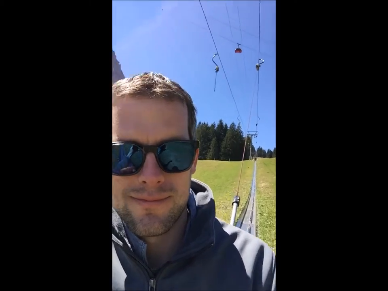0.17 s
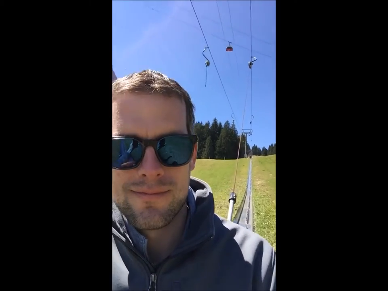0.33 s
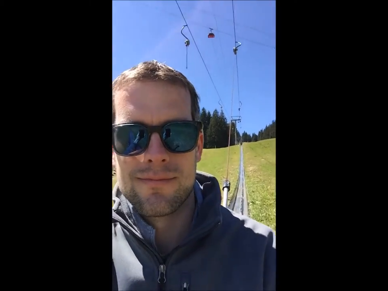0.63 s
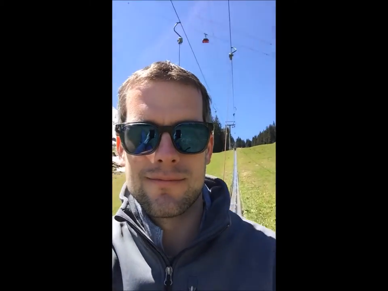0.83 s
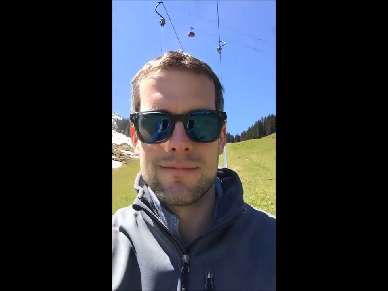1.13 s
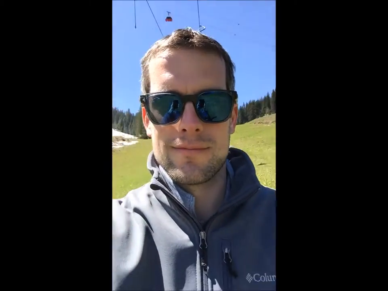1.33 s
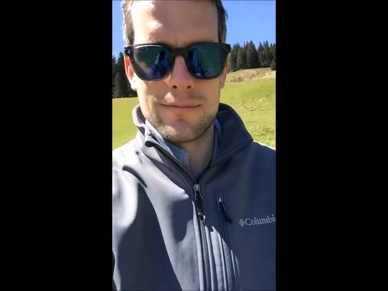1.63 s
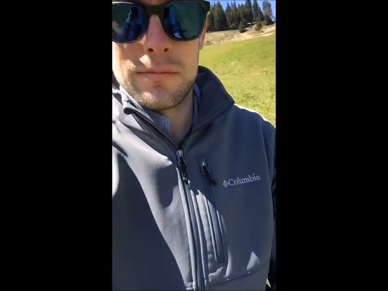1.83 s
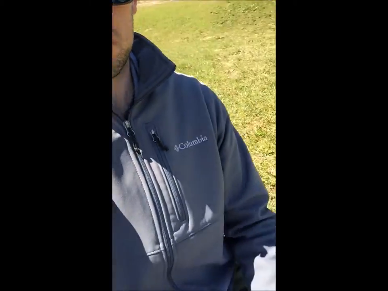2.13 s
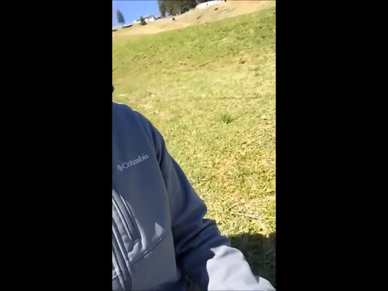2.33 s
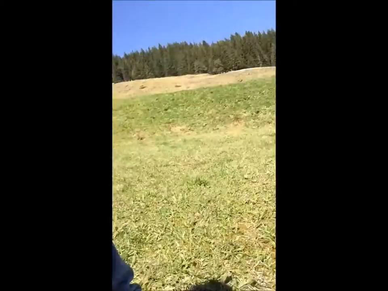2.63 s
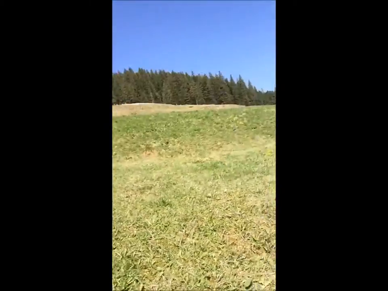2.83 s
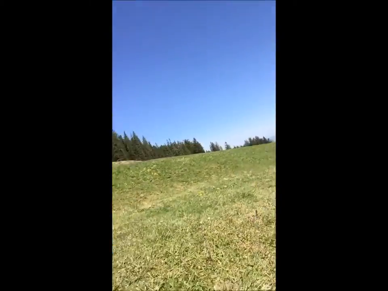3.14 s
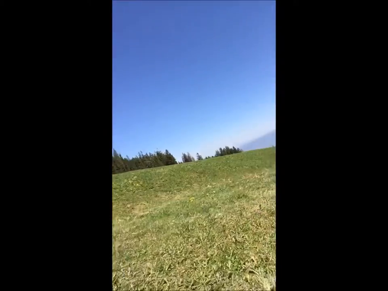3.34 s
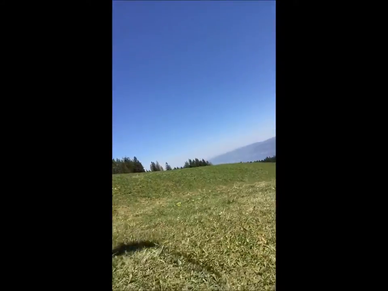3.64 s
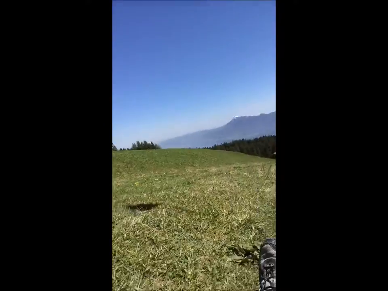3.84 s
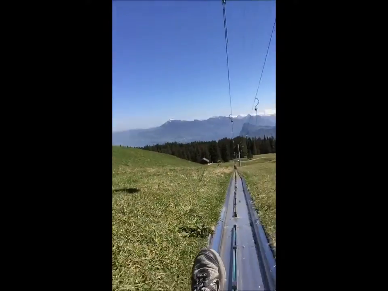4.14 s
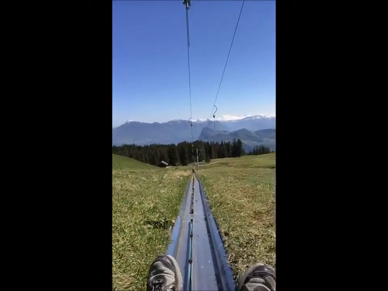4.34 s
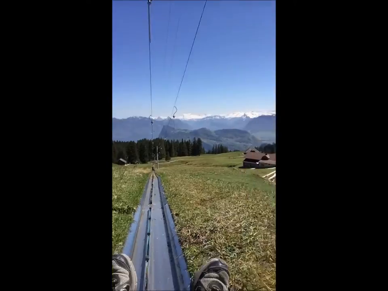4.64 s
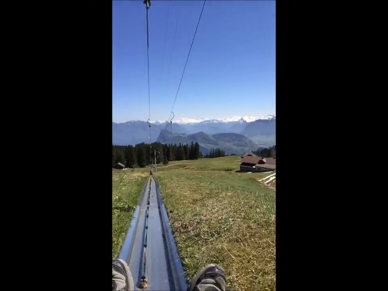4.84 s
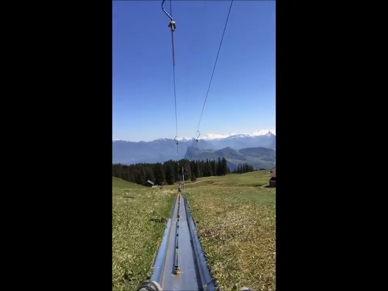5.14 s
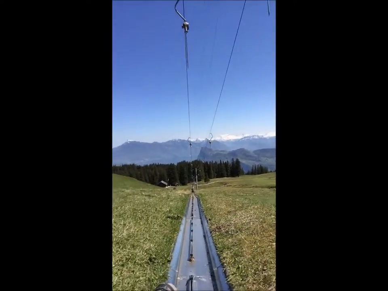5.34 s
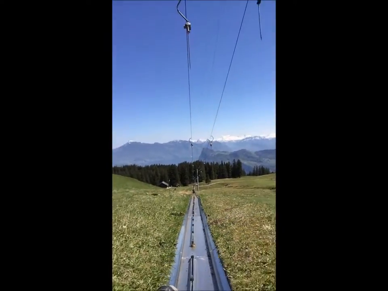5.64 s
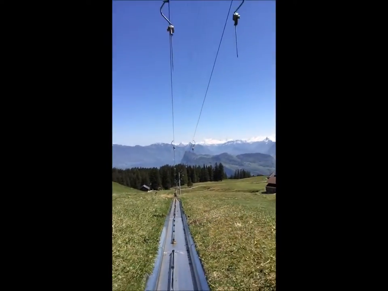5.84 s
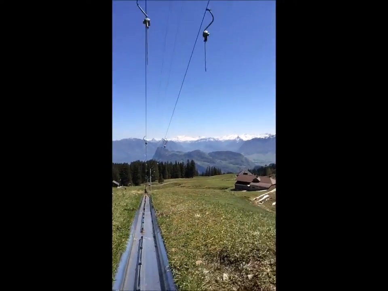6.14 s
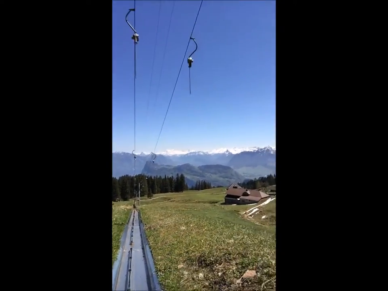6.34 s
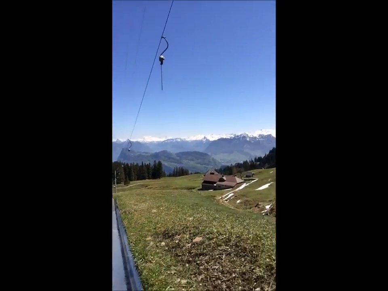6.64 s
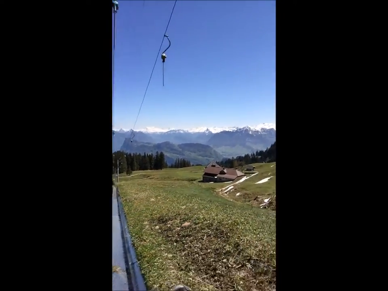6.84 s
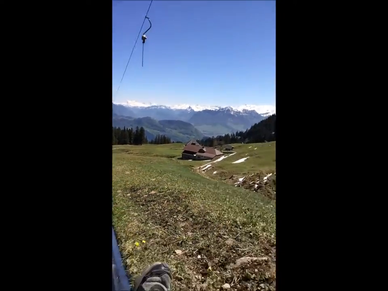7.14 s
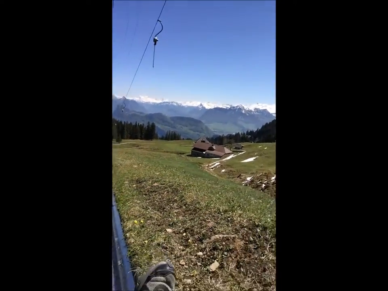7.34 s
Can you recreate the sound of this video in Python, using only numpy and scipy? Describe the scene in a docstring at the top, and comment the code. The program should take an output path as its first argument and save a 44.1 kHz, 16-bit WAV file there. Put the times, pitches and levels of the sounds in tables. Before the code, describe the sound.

Rapid metallic clacking from a sled's wheels on a jointed rail, starting fairly soft and dull, then getting louder and brighter after about two seconds. Hard jolts boom through the hollow plastic seat, loose fittings tick and rattle, and wheels rumble and scrape between blows. A sleeve rustles softly, light wind buffets the small phone-like microphone, and a thin high whistle flares now and then. Outdoors, with no echo.

```python
"""Wheels clack and rebound over the rail joints as a sled is towed up a mountain-coaster track, heard on board.
Each clack is a crowd of tiny collisions exciting steel resonances; decaying modes clang and ring on.
Damped swings thump the plastic shell, jolts make it boom, and small parts tick, ping and rattle.
Beneath lie coloured-noise rumble, scrape and hiss, a friction whistle, a wavering low hum,
a rustling sleeve and soft wind on the microphone."""
import sys
import numpy as np
from scipy import signal
from scipy.fft import rfft, irfft
from scipy.io import wavfile

SR = 44100
rng = np.random.default_rng(int(sys.argv[2]) if len(sys.argv) > 2 else 0)


def to_wav(sig):
    """Store sig (one row per channel, or 1-D mono) as 16-bit WAV at the path in sys.argv[1].

    Samples outside -1..1 are clipped; the rate is SR.
    """
    pcm = np.clip(np.atleast_2d(sig), -1, 1) * 32767
    pcm = np.round(pcm).astype(np.int16)
    wavfile.write(sys.argv[1], SR, pcm.T)  # frames by channels


N = 329868

# A wheel crosses a joint; levels before each layer's trim: (time [s], shell thud [dB], shell bark [dB],
# steel middle [dB], treble [dB], top [dB], low clang [Hz], high clang [Hz])
JOINT_CROSSINGS = [(0.0283, -32, -37.5, -43.5, -52, -67, 914, 2530),
                   (0.0447, -34.5, -31.5, -37, -48.5, -58, 1070, 4390),
                   (0.164, -30.5, -32.5, -36, -66.5, -74, 1004, 2300),
                   (0.2515, -34, -37, -37.0, -43.5, -60, 990, 3100),
                   (0.3698, -31, -40, -36, -39, -51, 1225, 3410),
                   (0.579, -27.5, -36, -30.5, -37.5, -54, 1340, 2950),
                   (0.6506, -38.5, -44.5, -33.5, -42, -61, 933, 3020),
                   (0.8517, -28.5, -36, -33, -38.5, -55.5, 1370, 2230),
                   (0.933, -26, -41, -37.5, -45, -58, 1616, 2280),
                   (1.1359, -36.5, -44, -36, -41.5, -62, 1255, 2440),
                   (1.1931, -40, -47.0, -42, -57, -70, 1180, 2720),
                   (1.2939, -40, -46, -38.5, -53, -64, 1206, 2400),
                   (1.5718, -29.5, -43, -32, -43.5, -55, 1182, 2480),
                   (1.7711, -22.5, -47, -28.5, -36.5, -49.5, 1205, 2140),
                   (1.8513, -36, -48, -29.5, -39.5, -57, 1330, 2486),
                   (2.036, -28, -34, -30, -38.5, -53.5, 2003, 3000),
                   (2.1375, -23, -30, -26, -36, -47, 1250, 3064),
                   (2.3498, -31.5, -40, -25, -33.5, -49.5, 1280, 3040),
                   (2.4379, -35, -44, -28.5, -34, -61, 1260, 3110),
                   (2.651, -31, -29, -32.0, -39.5, -53, 1218, 2560),
                   (2.7559, -31, -29, -35.5, -41.5, -55.5, 1420, 3230),
                   (2.8459, -36, -24, -36.5, -42.5, -49, 805, 3760),
                   (3.0581, -29.5, -45, -43, -49, -57, 1180, 3750),
                   (3.2211, -28.5, -43, -29, -36.5, -50, 1284, 2450),
                   (3.3019, -19, -39, -25, -34, -46, 1388, 3070),
                   (3.513, -31, -32, -23.0, -33, -47, 1128, 3084),
                   (3.5764, -29, -32, -29.5, -38, -52.5, 1160, 3080),
                   (3.7752, -31, -41, -26.5, -36, -53, 1013, 3190),
                   (3.8613, -36, -32.5, -30.5, -31, -43.5, 1240, 3000),
                   (4.0796, -38, -29, -28.5, -38.5, -50, 1080, 2300),
                   (4.1693, -34.0, -36, -30, -36.5, -47, 1210, 3030),
                   (4.275, -38, -38, -37.5, -53, -61, 1090, 3330),
                   (4.3956, -54, -34, -41, -67, -68, 1130, 2760),
                   (4.6174, -40, -35.5, -31.5, -42.5, -54, 1260, 3920),
                   (4.752, -25, -40, -26.5, -34.5, -38, 1346, 2140),
                   (4.9761, -36.0, -30.0, -31.5, -36, -48.5, 1370, 3250),
                   (5.053, -35.5, -31.5, -30.5, -39.5, -50, 1446, 4060),
                   (5.2603, -36, -31.5, -28.5, -37.5, -49, 1150, 3960),
                   (5.3492, -35, -26.5, -27.5, -33, -43, 1123, 3110),
                   (5.5678, -53, -28.5, -30, -41.5, -57, 987, 2470),
                   (5.6563, -39, -25.5, -29, -40.5, -52, 1090, 3120),
                   (5.7593, -59, -48, -41.5, -55, -57, 780, 4430),
                   (5.8839, -42, -39, -46, -55, -68.5, 975, 2420),
                   (6.1102, -31.0, -32, -35, -42.5, -56, 1780, 3410),
                   (6.2387, -32, -26, -26.5, -36, -45, 1370, 3130),
                   (6.4608, -45, -26, -28, -36, -54, 1965, 3050),
                   (6.5309, -30.5, -32.5, -33.5, -39.5, -53, 1370, 2930),
                   (6.7269, -34, -31, -29.5, -39, -55.5, 1300, 3020),
                   (6.8274, -27, -34, -25.5, -34, -48, 1255, 3097),
                   (7.0368, -30, -25.5, -30, -39, -54.5, 1310, 3000),
                   (7.159, -36, -32.5, -38, -43, -61, 1237, 3030),
                   (7.2419, -28, -33, -37, -48.5, -44.5, 1190, 4280),
                   (7.4578, -34, -36.5, -34, -40, -47.5, 1060, 2560)]
# Crossovers between the bass, middle, treble and top of a clack: [Hz]
CLACK_CROSSOVERS = [700, 2200, 7000]
# Broad spectrum of struck steel: (frequency [Hz], relative density [dB per Hz])
STEEL_SPECTRUM = [(50, -14), (120, -13.5), (240, -6.5), (450, -0.5), (700, -10), (1000, -8), (1380, -8),
                  (1500, -13.5), (1850, -12), (2700, -14.5), (4000, -21), (4800, -27), (6000, -29),
                  (10000, -53), (13000, -58.5), (16000, -65)]
# Resonances of wheel and rail: (frequency [Hz], width [Hz], lift [dB])
WHEEL_RESONANCES = [(1187, 110, 4.5), (1784, 130, 2), (2970, 110, 2.5), (3146, 400, 7.5), (3690, 290, 4.5),
                    (3990, 180, 5.5), (5264, 480, 9), (5200, 165, 3), (6150, 90, 2), (7450, 150, 1),
                    (11630, 450, 8.5), (12300, 290, 13)]
# Modes of the rail: (frequency [Hz], relative level [dB], 60 dB decay time [s])
RAIL_MODES = [(950, 1.5, 0.14), (1136, -7.5, 0.31), (1338, -2.5, 0.22), (1695, -19.5, 0.19),
              (2064, -14, 0.36), (3116, -5, 0.19), (3580, -4, 0.13), (4400, -6, 0.11)]


def clacks(size=8192, count=14, bass_db=-6):
    """Impact excitation: chattering contact drives steel resonances, and each joint adds modes of its own."""
    out, t = np.zeros(N), np.arange(size) / SR
    for s, _, _, middle_db, treble_db, top_db, low_hz, high_hz in JOINT_CROSSINGS:
        weak_hz = 700 * 2 ** (3.5 * rng.random(count))
        # weak resonances are lifted and lowered in turn
        weak_peaks = [(hz, 0.04 * hz, 5 * (-1) ** k) for k, hz in enumerate(weak_hz)]
        body = colour(STEEL_SPECTRUM, WHEEL_RESONANCES + weak_peaks)

        rise = rng.uniform(.0015, .0035)
        force = chatter(t, rise, fall=0.0077, tail_db=-5.5, tail_t60=0.089, grain_db=4)
        force += .8 * bounces(t - .0013, gap=.0024, contact=.00013)
        force += rebounds(t)
        blow = evened(signal.fftconvolve(force, body)[:size])

        clang_modes = [(low_hz, -1, 0.043), (high_hz, -5, 0.043)]
        clang = ring(clang_modes, t, scatter_db=1, detune=0)
        blow += gain_of(-6) * evened(clang * (1 - np.exp(-t / .0012)))

        own_modes = [(low_hz, 0, 0.17), (high_hz, -5, 0.17)]
        # higher weak modes are fainter and die sooner
        weak_modes = [(hz, -4 - 7 * np.log2(hz / 700), 0.35 * np.sqrt(700 / hz)) for hz in weak_hz]
        rail = evened(ring(RAIL_MODES + own_modes + weak_modes, t, scatter_db=2.5, detune=0.013))

        levels_db = np.array([middle_db + bass_db, middle_db, treble_db, top_db])
        add(out, s, weigh(blow + gain_of(-10) * rail, CLACK_CROSSOVERS, levels_db, span=0.018))
    return gain_of(0.62) * out


def bounces(t, gap, contact, count=4):
    """Inelastic rebound: a wheel lands and skips, with alternating sign and each touch weaker."""
    at = np.cumsum(gap * rng.uniform(.5, 1.5, (count, 1)), 0) - gap / 2
    strength = (-.85) ** np.arange(count)[:, None]
    return (np.exp(-((t - at) / contact) ** 2) * strength).sum(0)


def rebounds(t, first=0.011, last=0.06, fall=0.022, touch=0.00098, dull_hz=2200, count=8):
    """Repeated impact: the loose mounting strikes at uneven moments, dully and generally ever weaker."""
    at = first + (last - first) * (np.arange(count) + rng.random(count))[:, None] / count
    strength = gain_of(0.75 * rng.standard_normal((count, 1))) * np.exp(-at / fall)
    envelope = (strength * (t > at) * np.exp(-abs(t - at) / touch)).sum(0)
    touches = envelope * rng.standard_normal(len(t))
    return signal.sosfilt(signal.butter(2, dull_hz, fs=SR, output="sos"), touches)


def thumps(thud_hz=228, bark_hz=435, delay_s=0.0005):
    """Damped oscillation: every rail joint reaches the seat through the shell as a short, rounded thump."""
    out = np.zeros(N)
    for s, thud_db, bark_db, *_ in JOINT_CROSSINGS:
        thud = gain_of(thud_db + 4.5) * wobble(thud_hz, peak_s=0.0071)
        bark = gain_of(bark_db + 2.5) * wobble(bark_hz, peak_s=0.0072)
        add(out, s + delay_s, thud + bark)
    return out


def wobble(hz, peak_s, size=4096):
    """Heavy damping: a few swings swell and die, with random detuning and phase."""
    t = np.arange(size) / SR
    shift, turn = rng.uniform(-1, 1, 2)
    envelope = (t / peak_s * np.exp(1 - t / peak_s)) ** 2
    return envelope * np.sin(2 * np.pi * (hz * (1 + .12 * shift) * t + turn))


# The shell is jolted; levels before a common trim:
# (time [s], low thud [dB], higher bark [dB], hard crack [dB])
JOLTS = [(0.379, -21.5, -26.5, -30), (1.005, -42, -51, -63), (1.074, -32.5, -46.5, -63),
         (1.101, -45, -44.5, -51.5), (1.329, -35.5, -58, -48), (1.354, -35, -49, -58),
         (1.473, -41, -62, -50), (1.856, -20, -28.5, -28), (1.879, -29, -47, -47.5),
         (2.842, -27.5, -31, -36), (2.962, -34, -35.5, -54), (3.034, -34.5, -35, -59),
         (3.164, -56, -48, -40.5), (3.311, -25, -24, -21), (3.337, -26, -39, -41), (3.529, -42, -32, -54),
         (3.857, -38, -54, -35.5), (4.036, -38, -41.5, -55), (4.276, -28.5, -23.5, -69),
         (4.405, -33.5, -32, -45), (4.775, -16.5, -20, -18.5), (5.534, -34.5, -48, -51),
         (5.76, -39, -27.5, -47), (5.883, -29.5, -48, -43), (6.247, -28.5, -31, -48),
         (6.449, -46, -30.5, -63), (7.246, -27.5, -33, -29)]


def knocks():
    """Forced response: hard jolts set the shell booming."""
    out = np.zeros(N)
    for s, *levels_db in JOLTS:
        add(out, s, gain_of(0.76) * jolt(*levels_db, rise=0.0013))
    return out


# Crossovers between the thud, bark, crack and crunch of a knock: [Hz]
KNOCK_CROSSOVERS = [330, 560, 900]
# Modes of the shell: (frequency [Hz], relative level [dB], 60 dB decay time [s])
SHELL_MODES = [(173, 5, 0.11), (191, -4.5, 0.14), (252.3, 6, 0.12), (310, -6, 0.25), (364.6, -5, 0.14),
               (457, -5.5, 0.04), (548, -7, 0.066), (624, 2.5, 0.032), (770, -12.5, 0.097),
               (935, -8.5, 0.049)]
# Broad boom of the shell between its modes: (frequency [Hz], relative density [dB per Hz])
BOOM_SPECTRUM = [(50, -28), (110, -15), (185, 14), (260, -5.5), (400, -4), (650, -8.5), (800, -16),
                 (1350, -12), (1550, -21), (2100, -20), (3000, -30), (5000, -36.5), (10000, -62)]


def jolt(thud_db, bark_db, crack_db, rise, size=8192, lowest_hz=135, crunch_db=-7):
    """Modal excitation: a shove and rattle drive a hollow shell, whose boom holds little deep bass."""
    t = np.arange(size) / SR
    force = chatter(t, rise, fall=.0065, tail_db=-12, tail_t60=.085, grain_db=4.5)
    force += 1.16 * np.exp(-((t - .0015) / 0.00023) ** 2)  # the shove itself
    shell = evened(ring(SHELL_MODES, t, scatter_db=1, detune=0.014))
    shell += 0.78 * evened(colour(BOOM_SPECTRUM, size=size))
    bass_cut = signal.butter(2, lowest_hz, "high", fs=SR, output="sos")
    boom = signal.sosfilt(bass_cut, signal.fftconvolve(force, shell)[:size])
    # the crunch above the crack has a level relative to it
    levels_db = np.array([thud_db, bark_db, crack_db, crack_db + crunch_db])
    return weigh(boom, KNOCK_CROSSOVERS, levels_db, span=0.018)


# Small loose parts touch; levels before a common trim: (time [s], level [dB])
LIGHT_TOUCHES = [(2.354, -41), (2.44, -35), (2.819, -30), (3.069, -41), (3.7515, -47), (3.82, -42),
                 (4.67, -48), (5.7299, -57), (5.832, -40.5), (6.1904, -62)]


def ticks(size=2048):
    """Filtered impact: brief chatter excites the bright resonances of small parts."""
    out, t = np.zeros(N), np.arange(size) / SR
    body = colour([(1000, -10), (3500, 3), (5000, -5), (7200, -1), (8500, -9), (10000, -6), (16000, -16)])
    for s, db in LIGHT_TOUCHES:
        force = chatter(t, rise=.0004, fall=.007, tail_db=-18, tail_t60=.07, grain_db=4)
        tick = signal.fftconvolve(force, body)[:size]
        add(out, s, gain_of(db - 14.5) * evened(tick))
    return out


# A wheel rim brushes the rail; levels before a common trim: (time [s], level [dB])
RIM_BRUSHES = [(1.187, -61), (2.7602, -39), (4.401, -63.5), (5.702, -57), (5.891, -54.5), (7.191, -60)]
# Modes of a wheel rim: (frequency [Hz], relative level [dB], 60 dB decay time [s])
RIM_MODES = [(557, 10, .08), (1060, -3, 0.24), (1408, -1, .06), (1980, -7.5, 0.41), (2360, -5, 0.12),
             (2570, 5, 0.065), (2665, 1, 0.11), (2970, 3.5, 0.094), (3310, -5, 0.15), (3930, -6.5, 0.11)]


def pings(size=8192):
    """Modal decay: a soft touch stirs the rim, whose modes then die away."""
    out, t = np.zeros(N), np.arange(size) / SR
    for s, db in RIM_BRUSHES:
        rim = ring(RIM_MODES, t, scatter_db=4.7, detune=0.0024)
        add(out, s, gain_of(db + 6) * rim * (1 - np.exp(-t / 0.0019)))
    return out


# Loose fittings shake in flurries; levels before the fine stutter: (time [s], level [dB])
FLURRIES = [(1.0, -55), (1.205, -40.5), (1.447, -51.5), (2.945, -42), (2.977, -36.5), (3.04, -45),
            (3.071, -33.5), (3.19, -47), (3.89, -36), (4.125, -47), (4.965, -45.5), (5.52, -55),
            (5.78, -46), (5.897, -37.5), (6.285, -71), (6.425, -44), (6.66, -46.5), (7.18, -39),
            (7.362, -43.5)]


def rattle(lasting=0.018, per_second=70, fall=0.0066, jitter_db=-5, shudder_db=-21, settle_s=0.024):
    """Random impacts: fittings shake in flurries, shudder after joints and jitter with the scrape."""
    t = np.arange(N) / SR
    flurries = swells([(s, lasting, db) for s, db in FLURRIES])
    flurries = flurries * (.55 + .5 * stutter(400, .0008))
    shudder = np.zeros(N)
    for s, _, _, strength_db, *_ in JOINT_CROSSINGS:
        add(shudder, s, gain_of(strength_db + shudder_db) * np.exp(-t[:SR // 2] / settle_s))
    scraping = gain_of(curves(ROLLING_LEVELS)[1] + jitter_db)
    shake = flurries + (shudder + scraping) * stutter(per_second, fall)
    grain = gain_of(3 * drift(400))
    return shake * noise(SCRAPE_SPECTRUM, grain, TRACK_RESONANCES)


# Rolling between joints; levels before each layer's trim:
# (time [s], rumble [dB], scrape [dB], hiss [dB])
ROLLING_LEVELS = [(0.13, -40, -57.5, -78), (0.34, -40.5, -53, -65), (0.5, -46, -58, -73),
                  (0.78, -44.5, -60.5, -73), (1.03, -49.5, -55, -73), (1.48, -42, -55.5, -78),
                  (1.7, -43.5, -54.5, -73), (1.97, -45, -53.5, -64.5), (2.27, -43, -50, -66),
                  (2.57, -39.5, -47.5, -66), (3.43, -42, -51, -65), (3.7, -41, -55, -61.5),
                  (4.0, -42.5, -50.5, -60.5), (4.36, -41, -52.5, -60), (4.57, -47, -58, -63),
                  (4.71, -42, -50.5, -60), (4.89, -42, -56, -67), (5.18, -43, -57, -63.5),
                  (5.48, -43, -54.5, -59.5), (5.85, -39, -47.5, -57.5), (6.02, -43.5, -56.5, -61.5),
                  (6.2, -39.5, -51.5, -64), (6.37, -42, -51, -62), (6.65, -42.5, -54, -60),
                  (6.96, -41.5, -53, -59), (7.12, -43, -49.5, -61), (7.38, -38, -52.5, -67)]
# A wheel rides over a dent and the shell grumbles; levels before trims: (time [s], level [dB])
TRACK_DENTS = [(0.63, -34), (1.25, -46), (1.66, -59), (2.51, -37), (2.595, -39), (2.889, -33), (3.012, -29),
               (3.557, -27.5), (3.644, -36), (3.715, -38), (4.024, -34), (4.316, -42), (4.43, -47),
               (4.48, -31.5), (4.665, -33), (5.51, -36), (5.73, -33.5), (5.799, -31), (6.344, -46),
               (6.427, -33.5), (6.49, -27.5), (6.662, -34), (6.972, -29), (7.3, -53), (7.36, -42)]
# Spectra of the rolling layers: (frequency [Hz], relative density [dB per Hz])
RUMBLE_SPECTRUM = [(80, -40), (130, -9), (175, -3.5), (215, 5), (250, -2), (305, -3), (360, -3), (470, -10),
                   (540, -12), (750, -20.5), (1200, -61.5)]
SCRAPE_SPECTRUM = [(400, 4.5), (700, 5.5), (900, 4), (1180, 2), (1450, 2), (1850, -5), (2400, -6),
                   (3100, -12), (4200, -15), (7000, -51)]
HISS_SPECTRUM = [(1800, -15), (3200, -6), (4450, 4), (4850, -3), (5300, -1), (6800, -3), (7600, -14.5),
                 (8300, -22), (10200, -21), (11800, -12), (13500, -29), (16000, -38)]
# Resonances of the rail under rolling wheels: (frequency [Hz], width [Hz], lift [dB])
TRACK_RESONANCES = [(1103, 150, 2.5), (1300, 110, 1), (1704, 18, 12), (1597, 11, 18), (1910, 54, 7.5),
                    (2980, 34, 13.5)]


def rolling(dent_s=0.016):
    """Roughness excitation: uneven steel shakes the shell, scrapes under the wheels and hisses."""
    rumble_db, scrape_db, hiss_db = curves(ROLLING_LEVELS)
    bumps = drift(34)  # shared by all three layers
    dents = swells([(s, dent_s, db) for s, db in TRACK_DENTS])

    rumble = noise(RUMBLE_SPECTRUM, gain_of(2 * bumps + 2.6 * drift(90)))
    rumble = patchy(rumble, depth_db=3.2, width_hz=120, lasting=0.05)
    rumble *= np.hypot(gain_of(rumble_db + 2.5), gain_of(0.5) * dents)

    scrape = noise(SCRAPE_SPECTRUM, gain_of(2.4 * bumps + 2.5 * drift(200)), TRACK_RESONANCES)
    scrape = patchy(scrape, depth_db=4.2, width_hz=130, lasting=0.12)
    scrape *= gain_of(scrape_db + 0.3) + gain_of(-22) * dents

    hiss = noise(HISS_SPECTRUM, gain_of(2.2 * bumps + 0.56 * drift(600)))
    hiss = patchy(hiss, depth_db=2, width_hz=250, lasting=.08)
    return rumble + scrape + gain_of(hiss_db - 1.5) * hiss


def patchy(x, depth_db, width_hz, lasting):
    """Moving contact: resonances come and go as the wheels move along the rail."""
    z = signal.stft(x, nperseg=1024, noverlap=768)[2]
    bins = signal.windows.hann(int(width_hz * 1024 / SR) + 3)
    frames = signal.windows.hann(int(lasting * SR / 256) + 3)
    random_field = rng.standard_normal(z.shape)
    field = evened(signal.fftconvolve(random_field, np.outer(bins, frames), "same"))
    return evened(signal.istft(z * gain_of(depth_db * field), nperseg=1024, noverlap=768)[1][:N])


def hum(hz=127, db=-53):
    """Frequency and amplitude modulation: the tow hums low, wavering about a mean pitch and level."""
    return tone(hz * (1 + 0.0099 * drift(6.9)), db + 2 * drift(3.2))


# The whistle flares; levels before its flutter: (time of height [s], half-length [s], level [dB])
WHISTLE_FLARES = [(2.15, .25, -83), (2.55, 0.17, -87), (4.41, 0.084, -64), (6.02, .1, -75),
                  (7.38, 0.13, -64.5)]
# Centre pitch of the whistle before its wavering: (time [s], frequency [Hz])
WHISTLE_PITCH = [(2.0, 7520), (2.3, 7500), (2.6, 7700), (4.27, 7560), (4.4, 7170), (4.47, 7540),
                 (5.15, 7500), (5.3, 7800), (5.45, 7350), (5.9, 7700), (6.08, 7400), (7.1, 7670),
                 (7.33, 7300), (7.48, 7360)]


def singing(under_hiss_db=-14):
    """Friction-driven oscillation: sliding metal whistles thinly with the hiss and sometimes flares."""
    level = gain_of(curves(ROLLING_LEVELS)[2] + under_hiss_db) + swells(WHISTLE_FLARES)
    pitch = curves(WHISTLE_PITCH)[0] + 65 * drift(30)
    flutter = .9 * drift(70) + .55 * drift(350)
    return level * tone(pitch, 0) * flutter


# The arm moves and its sleeve rubs; levels before a common trim:
# (time of height [s], half-length [s], level [dB])
ARM_STROKES = [(.1, 0.26, -67), (2.47, 0.32, -59), (3.0, 0.1, -53.5), (3.98, 0.24, -58.5), (4.6, 0.1, -69),
               (5.75, 0.29, -58)]
# Spectrum of rubbing nylon: (frequency [Hz], relative density [dB per Hz])
NYLON_SPECTRUM = [(2000, -21), (4000, 4.5), (7500, 4), (9500, -0.5), (12500, -6), (16000, -3.5)]


def rustle(crinkle=0.19, rest_db=-63):
    """Frictional noise: nylon rubs on nylon in fine, bright grains and small crinkles."""
    rubbing = gain_of(rest_db) + swells(ARM_STROKES)
    grain = gain_of(2 * drift(40) + 1.1 * drift(900))
    grain = grain * (1 + crinkle * stutter(160, .0006))
    return gain_of(-8) * rubbing * noise(NYLON_SPECTRUM, grain)


# A gust buffets the microphone; levels before a common trim:
# (time of height [s], half-length [s], level [dB])
WIND_GUSTS = [(.03, 0.027, -38), (1.34, 0.046, -34), (1.48, 0.032, -37), (1.87, 0.044, -32),
              (2.13, 0.044, -39), (2.78, 0.11, -34.5), (3.03, 0.086, -39), (3.5, 0.034, -39),
              (4.02, 0.025, -34), (4.23, 0.055, -33), (4.48, 0.019, -29), (5.35, 0.085, -30)]
# Spectrum of the buffeting: (frequency [Hz], relative density [dB per Hz])
WIND_SPECTRUM = [(15, -56), (30, -13), (52, -7), (75, -7), (110, -7), (200, -16), (500, -86)]


def wind(breeze_db=-48.5):
    """Turbulent pressure noise: soft buffets on the microphone rise over a light breeze."""
    strength = gain_of(breeze_db) + swells(WIND_GUSTS)
    return strength * noise(WIND_SPECTRUM, gain_of(0.57 * drift(17))) * gain_of(-7)


def chatter(t, rise, fall, tail_db, tail_t60, grain_db):
    """Random contact force: tiny collisions swell, die quickly and leave a faint shiver."""
    push, size = rng.standard_normal((2, len(t)))
    swell = 1 - np.exp(-(t / rise) ** 2)
    main = np.exp(-t / fall) * gain_of(grain_db * size)
    shiver = gain_of(tail_db - 60 * t / tail_t60)
    return push * swell * (main + shiver)


def ring(modes, t, scatter_db, detune):
    """Modal superposition: decaying sines, stirred differently as each blow lands elsewhere."""
    hz, db, t60 = np.transpose(modes)[:, :, None]
    size, shift, sign = rng.standard_normal((3, len(modes), 1))
    envelope = gain_of(db + scatter_db * size - 60 * t / t60)
    waves = np.sin(2 * np.pi * hz * (1 + detune * shift) * t)
    return (np.sign(sign) * envelope * waves).sum(0)


def weigh(x, edges_hz, levels_db, span):
    """Band equalisation: sets each band's strength over the first span seconds, starting from rest."""
    hz = np.fft.rfftfreq(2 * len(x), 1 / SR)
    below = [0 * hz] + [1 / (1 + (hz / edge) ** 8) for edge in edges_hz] + [1 + 0 * hz]
    bands = irfft(rfft(x, 2 * len(x)) * np.diff(below, axis=0))[:, :len(x)]
    bands *= 1 - np.exp(-(np.arange(len(x)) / SR / .0007) ** 2)
    strengths = bands[:, :int(span * SR)].std(1)
    return (gain_of(levels_db) / strengths) @ bands


def stutter(per_second, fall):
    """Poisson-like impacts: small touches come at random and die at once, giving an envelope of rms 1."""
    t = np.arange(SR // 4) / SR
    kicks = (rng.random(N) < per_second / SR) * rng.exponential(1, N)
    return evened(signal.fftconvolve(kicks, t * np.exp(-t / fall))[:N])


def swells(rows):
    """Superposed envelopes: one smooth Gaussian rise and fall in amplitude for each row."""
    t = np.arange(N) / SR
    return sum(gain_of(db) * np.exp(-((t - s) / half) ** 2) for s, half, db in rows)


def drift(rate_hz):
    """Low-pass random process: smooth variation of rms 1 up to about this rate."""
    hz = np.fft.rfftfreq(N, 1 / SR)
    return evened(irfft(rfft(rng.standard_normal(N)) / (1 + (hz / rate_hz) ** 4), N))


def tone(hz, db):
    """Phase accumulation: a sine follows a pitch and an rms level."""
    return np.sqrt(2) * gain_of(db) * np.sin(2 * np.pi * np.cumsum(hz) / SR)


def noise(points, drive=1, peaks=()):
    """Source-filter principle: random forcing of varying strength is heard through a colour, at rms 1."""
    return evened(signal.oaconvolve(drive * rng.standard_normal(N), colour(points, peaks))[:N])


def colour(points, peaks=(), size=4096):
    """Minimum-phase response: a causal filter with a broad spectrum and added resonances."""
    hz = abs(np.fft.fftfreq(size, 1 / SR))
    db = read(points, hz) + sum(lift / (1 + (2 * (hz - f) / width) ** 2) for f, width, lift in peaks)
    # the Hilbert transform of log magnitude gives the phase
    return np.fft.ifft(np.exp(np.conj(signal.hilbert(np.log(gain_of(db)))))).real


def read(points, hz):
    """Logarithmic interpolation: joins a spectrum by straight lines on a log-frequency axis."""
    f, value = np.transpose(points)
    return np.interp(np.log(hz + 1), np.log(f + 1), value)


def curves(rows):
    """Linear interpolation: reads each column of a time table at every sample."""
    s, *columns = np.transpose(rows)
    return [np.interp(np.arange(N) / SR, s, c) for c in columns]


def gain_of(db):
    """Logarithmic level: converts decibels to amplitude."""
    return 10 ** (np.asarray(db) / 20)


def evened(x):
    """Power normalisation: scales to rms 1."""
    return x / np.sqrt(np.mean(x ** 2) + 1e-20)


def add(mix, s, sound):
    """Linear superposition: mixes a sound in at time s."""
    part = mix[max(round(s * SR), 0):][:len(sound)]
    part += sound[:len(part)]


def scene():
    """Superposition in the open air: all sources sum directly, without reverberation."""
    blows = clacks() + thumps() + knocks() + ticks() + pings() + rattle()
    return (blows + rolling() + hum() + singing() + rustle() + wind())[None]


def record(dry, low_hz=46, edge_hz=15850):
    """Transducer limits: a small microphone drops deep bass, rounds hard peaks and is band-limited."""
    thin = signal.sosfilt(signal.butter(3, low_hz, "high", fs=SR, output="sos"), dry)
    rounded = thin / (1 + (thin / .85) ** 6) ** (1 / 6)
    low_pass = signal.firwin(511, edge_hz, window=("kaiser", 9), fs=SR)
    return signal.oaconvolve(rounded, low_pass[None], "same")


dry = scene()
out = record(dry)
to_wav(out)
```